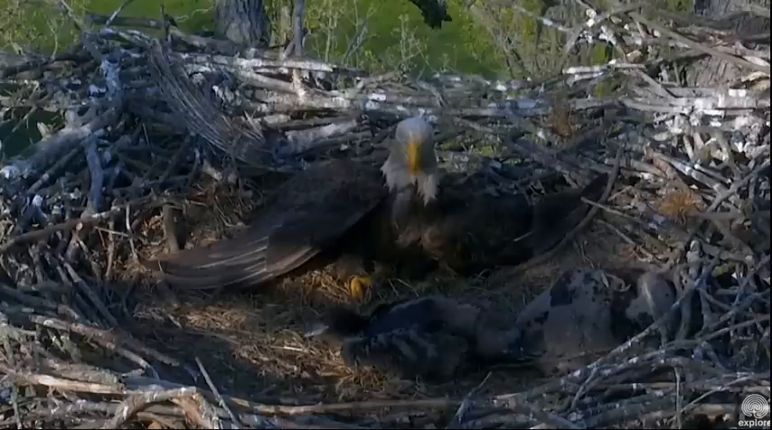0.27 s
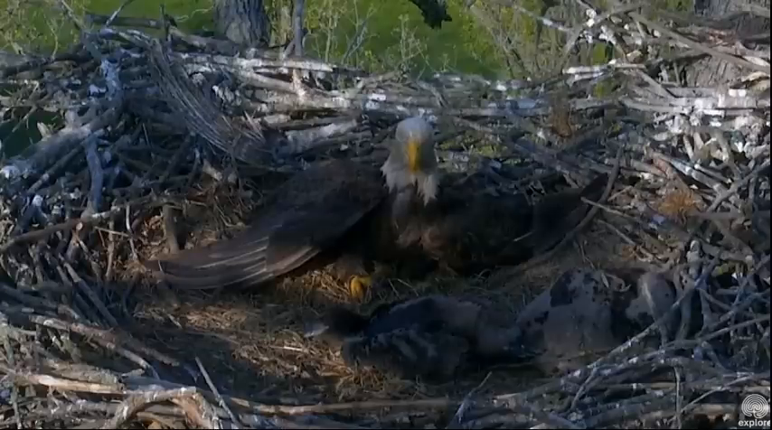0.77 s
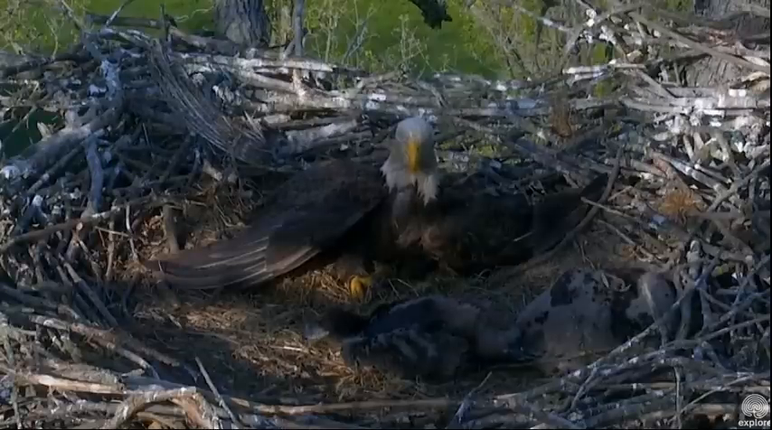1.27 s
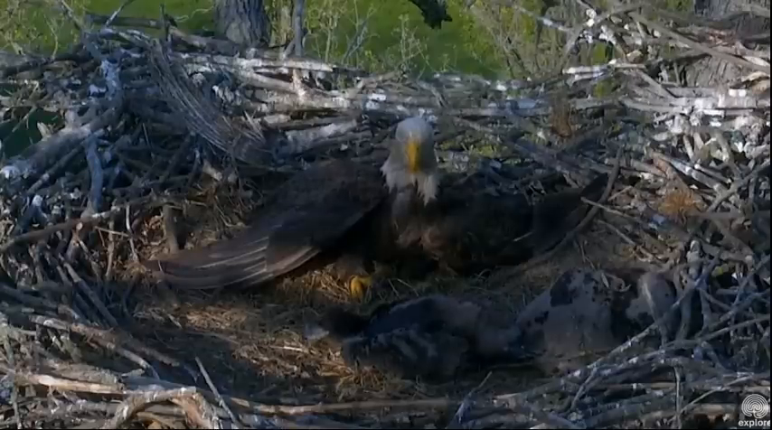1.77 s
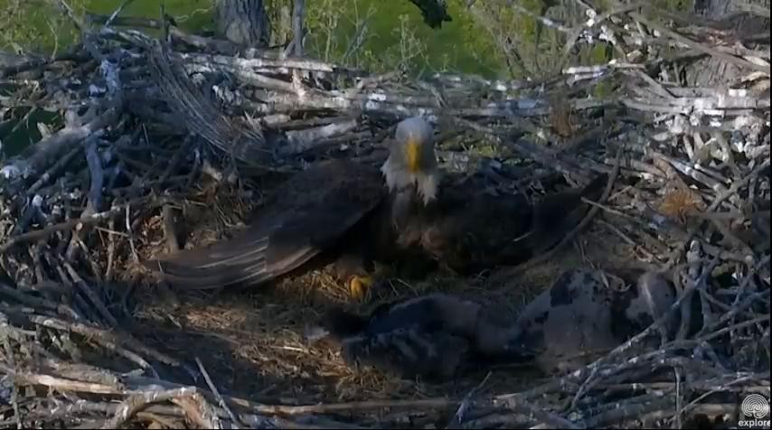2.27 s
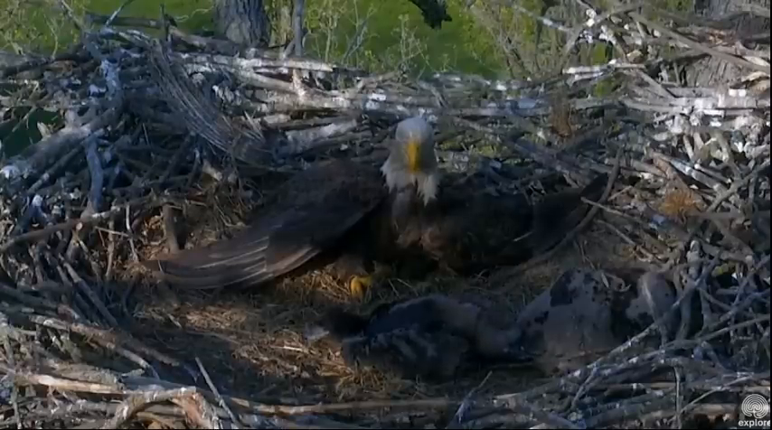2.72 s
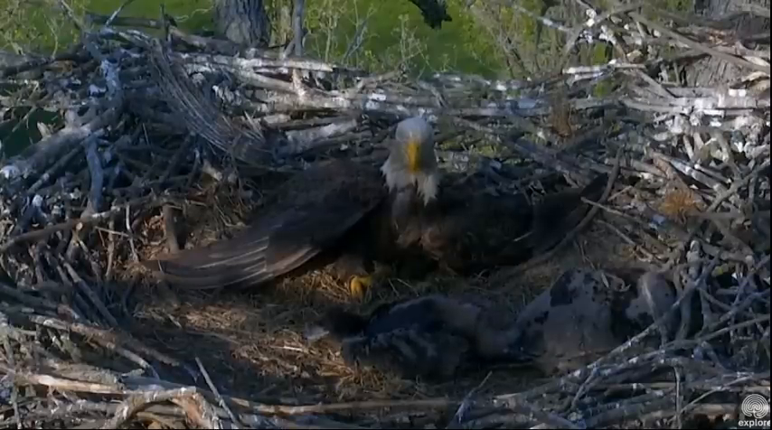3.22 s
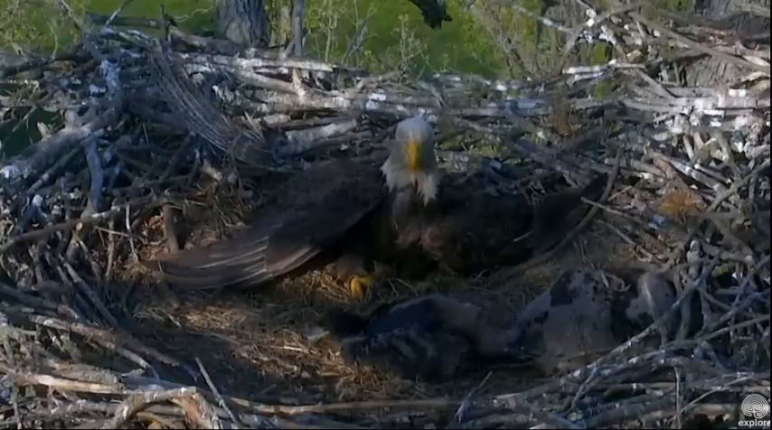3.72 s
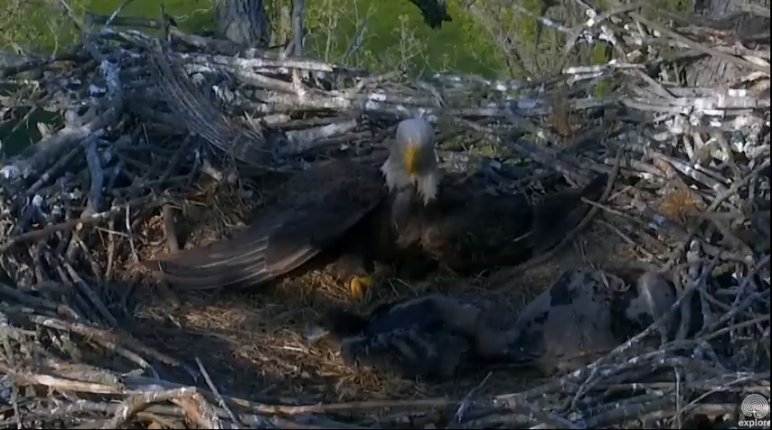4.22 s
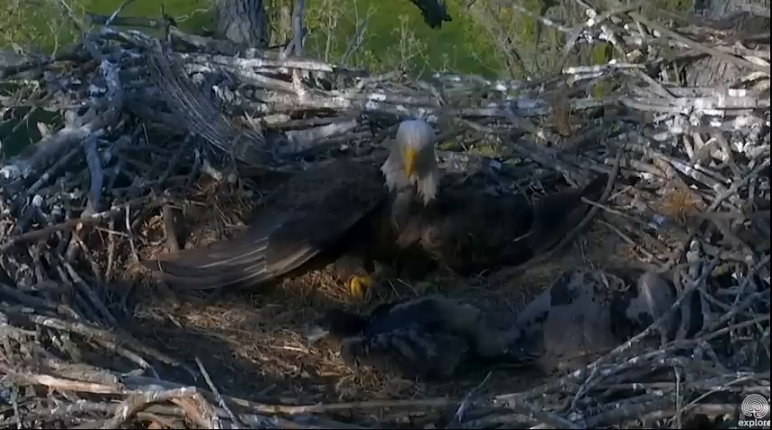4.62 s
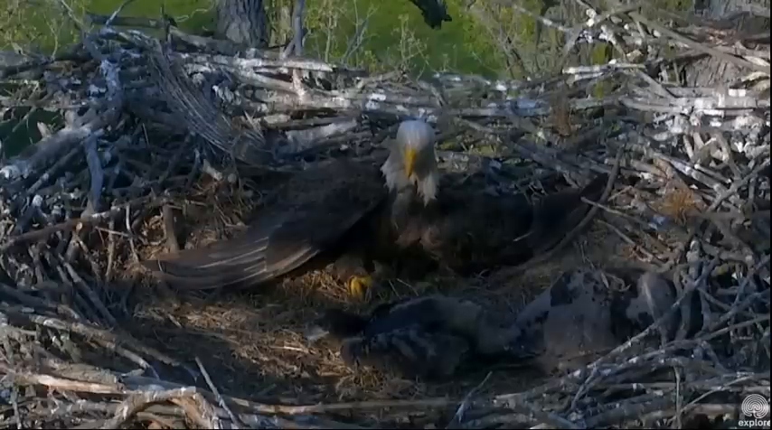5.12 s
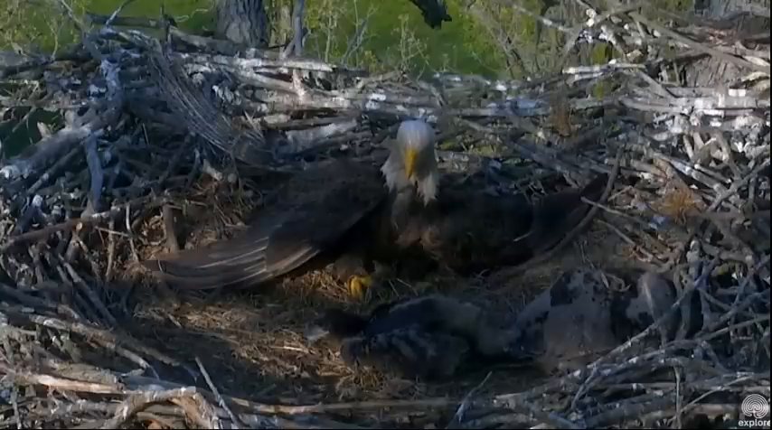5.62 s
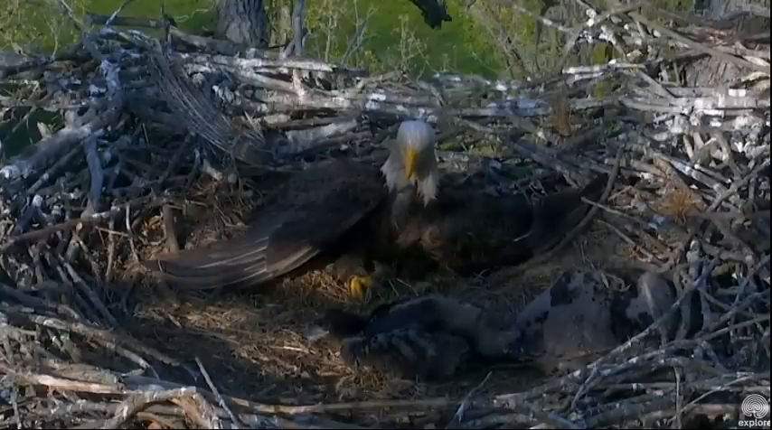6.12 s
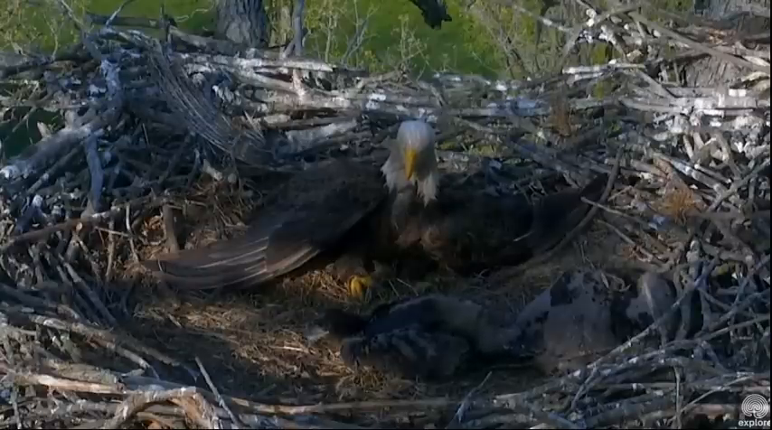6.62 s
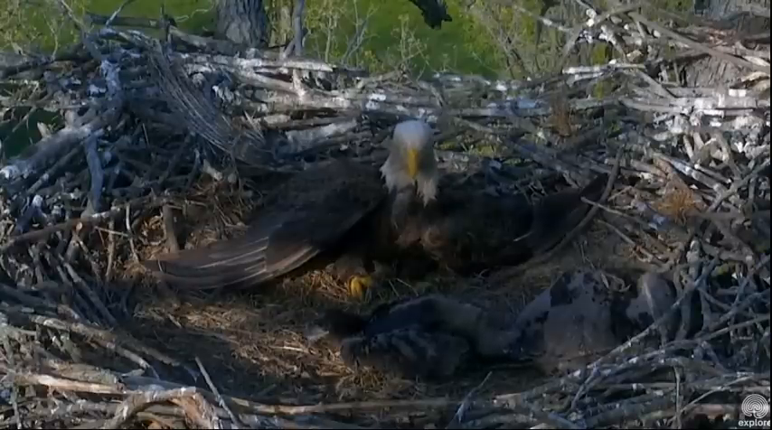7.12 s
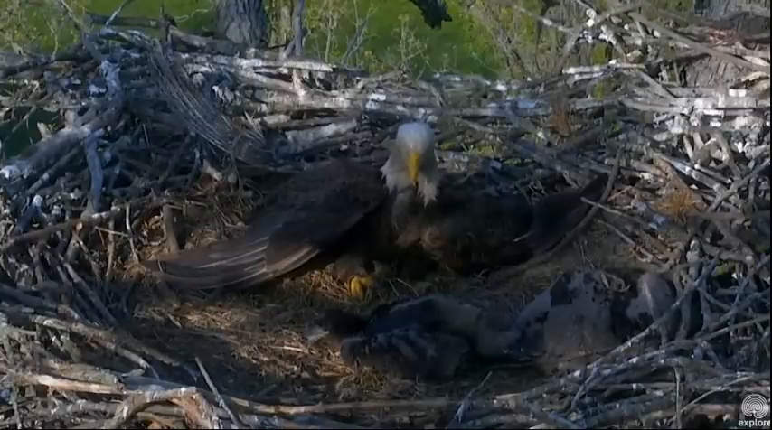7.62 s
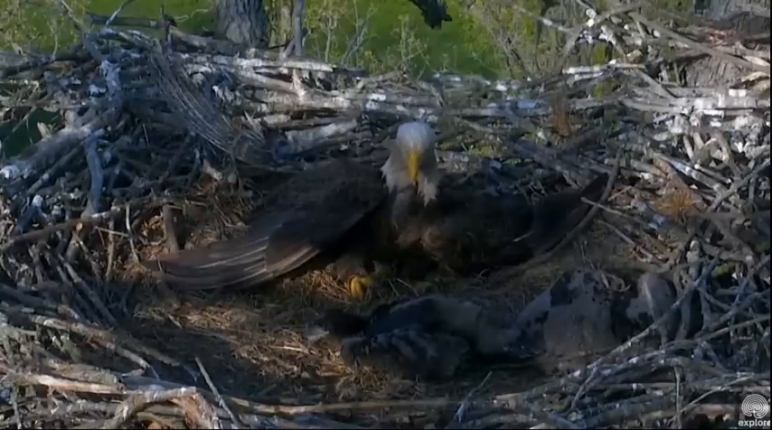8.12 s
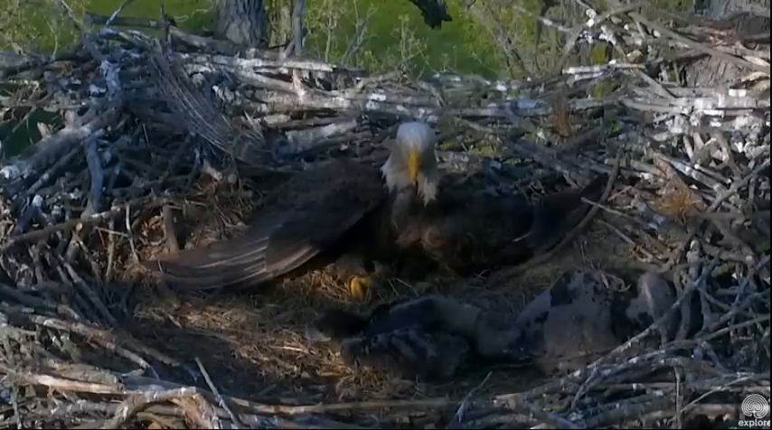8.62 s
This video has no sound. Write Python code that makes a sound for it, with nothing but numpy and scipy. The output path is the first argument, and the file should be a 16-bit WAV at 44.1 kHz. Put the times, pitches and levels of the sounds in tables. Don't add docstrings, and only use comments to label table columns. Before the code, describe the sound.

Four toads at a pond trill in long, purring musical whistles, each pulsing over forty times a second at close but different pitches. Trills enter one by one, build to a shimmering chorus, slow slightly and end separately. Far-off small birds chip, whistle and buzz faintly in the wood. Light outdoor echo, soft air noise, steady low electronic hum and thin whines from a cheap, narrow-band outdoor camera microphone.

```python
import sys
import numpy as np
from scipy import signal
from scipy.fft import rfft, irfft, next_fast_len
from scipy.io import wavfile
from scipy.ndimage import uniform_filter1d

SR = 44100
rng = np.random.default_rng(int(sys.argv[2]) if len(sys.argv) > 2 else 0)


def ratio_of_db(decibels):
    return 10 ** (np.asarray(decibels, float) / 20)


def pcm_store(signal):
    levels = np.round(np.clip(np.atleast_2d(signal), -1, 1) * 32767)
    wavfile.write(sys.argv[1], SR, levels.astype(np.int16).T)


N = 391166


def evened(x):
    return x / np.sqrt(np.mean(x ** 2) + 1e-30)


def read(points, hz):
    f, value = np.transpose(points)
    return np.interp(np.log(hz + 1), np.log(f + 1), value)


def colour(x, points):
    size = next_fast_len(N + 4096)
    gain = ratio_of_db(read(points, np.fft.rfftfreq(size, 1 / SR)))
    return irfft(rfft(x, size) * gain, size)[:N]


def drift(per_s):
    span = max(int(SR / 50 / per_s), 2)
    coarse = rng.standard_normal(N // 50 + 2)
    coarse = uniform_filter1d(uniform_filter1d(coarse, span), span)
    return np.interp(np.arange(N) / 50, np.arange(len(coarse)), evened(coarse))


def whistle(hz, slip=0):
    cycles = np.cumsum(hz) / SR + rng.random()
    return np.sqrt(2) * np.sin(2 * np.pi * cycles + slip)


def wood(x, t60, wet_db, gap=.004):
    size = SR // 2
    taps = np.zeros(size)
    at = np.arange(0, size - 24, 24) + rng.integers(0, 24, (size - 1) // 24)
    taps[at] = rng.choice([-1., 1.], len(at))
    t = np.arange(size) / SR
    taps *= ratio_of_db(-60 * t / t60) * (t > gap)
    echoes = signal.oaconvolve(x, taps / np.linalg.norm(taps))[:N]
    return x + ratio_of_db(wet_db) * echoes


def toad(pace, voice, open_share, edge, sag_hz, wander_hz, uneven_db):
    t = np.arange(N) / SR
    s, level_db, hz = np.transpose(voice)
    gone, pace_points = pace
    at, per_s = np.transpose(pace_points)
    throbs = gone + np.cumsum(np.interp(t, at, per_s, 0)) / SR
    turn = 2 * np.pi * throbs
    closing_point = np.cos(np.pi * np.clip(open_share, .1, .9))
    gate = 1 / (1 + np.exp(-edge * (np.cos(turn) - closing_point)))
    pitch = np.interp(t, s, hz) - sag_hz * np.sin(turn) + wander_hz * drift(14.08)
    effort = ratio_of_db(np.interp(t, s, level_db, -200, -200) + uneven_db * drift(44.0))
    count = np.round(throbs).astype(int)
    slip = np.cumsum(1.7 * rng.standard_normal(500))[count]
    return effort * evened(gate) * whistle(pitch, uniform_filter1d(slip, size=200))


# start_s, level_db, pitch_hz
LOW_VOICE = [
    (0, -59, 1756),
    (2, -56.5, 1747),
    (3, -60.5, 1745),
    (4, -56.5, 1743),
    (6, -55, 1735),
    (7, -57, 1737),
    (7.801, -61.5, 1732),
    (8.3, -62.5, 1749),
    (8.87, -58, 1735),
]
NEAR_VOICE = [
    (1.0, -68, 1790),
    (1.2, -59.5, 1808),
    (1.5, -55, 1820),
    (2, -52.6, 1828),
    (3, -52.2, 1827),
    (5.5, -51, 1823),
    (7.5, -53, 1820),
    (7.85, -54.5, 1810),
    (7.9, -80, 1810),
]
HIGH_VOICE = [
    (1.86, -80, 1900),
    (1.95, -62.5, 1935),
    (2.2, -60, 1945),
    (3, -59.5, 1940),
    (4, -56, 1932),
    (5.5, -54.5, 1932),
    (6.5, -57, 1928),
    (7.02, -59.5, 1918),
    (7.07, -80, 1918),
]
LATE_VOICE = [
    (7.15, -72, 1904),
    (7.7, -62, 1883),
    (8.2, -59, 1868),
    (8.87, -60, 1863),
]
LOW_PACE = .84, [(0, 45.93), (.5, 44.14), (1.5, 44.24), (2.5, 44.82), (4, 43.88), (7, 43.34), (8.87, 42.46)]
NEAR_PACE = .36, [(1, 44.75), (1.4, 47.37), (2, 44.45), (4, 41.62), (5, 42.34), (7, 40.52), (7.5, 40.9),
             (7.9, 37.25)]
HIGH_PACE = .6, [(1.85, 53.03), (2.5, 49.29), (3.5, 46.83), (5, 45.17), (6.5, 43.91), (7.05, 38.78)]
LATE_PACE = .06, [(7.15, 46.79), (8.87, 46.79)]


def chorus():
    low = toad(LOW_PACE, LOW_VOICE, .47, edge=4.5, sag_hz=14, wander_hz=7, uneven_db=1.1)
    near = toad(NEAR_PACE, NEAR_VOICE, .44, edge=4.2, sag_hz=12, wander_hz=6, uneven_db=1.1)
    high = toad(HIGH_PACE, HIGH_VOICE, .33, edge=2.9, sag_hz=8, wander_hz=7, uneven_db=1.1)
    late = toad(LATE_PACE, LATE_VOICE, .38, edge=3.0, sag_hz=8, wander_hz=9, uneven_db=1.3)
    return ratio_of_db(-.6) * sum(wood(voice, .5, -12, gap=.02) for voice in (low, near, high, late))


def note(length_s, start_hz, middle_hz, end_hz, level_db):
    u = np.linspace(0, 1, max(int(length_s * SR), 16))
    hz = start_hz * (1 - u) * (1 - 2 * u)
    hz += middle_hz * 4 * u * (1 - u)
    hz += end_hz * u * (2 * u - 1)
    return ratio_of_db(level_db) * whistle(hz) * signal.windows.tukey(len(u), .25)


def bend(start_hz, end_hz, early):
    return start_hz, start_hz + early * (end_hz - start_hz), end_hz


# start_s, end_hz, level_db
CHIPS = [
    (.195, 3200, -75.5),
    (.302, 2950, -74.5),
    (.354, 3100, -77.5),
    (.419, 2420, -74.5),
    (.522, 2850, -74.5),
    (.637, 2700, -76),
    (.694, 3000, -76.5),
    (.862, 2950, -76),
    (1.037, 2900, -75),
    (1.203, 3300, -79),
]
# start_s, length_s, start_hz, level_db
FALLS = [(.242, .04, 2930, -72.5), (.352, .04, 2950, -74.5), (.441, .03, 2610, -74.5),
         (.582, .021, 2670, -75.5), (.692, .04, 2750, -76.5), (.825, .013, 3400, -73.5),
         (1.036, .036, 2880, -71.5), (1.614, .017, 2450, -73.5), (1.688, .04, 2600, -74.5),
         (2.234, .06, 2950, -75.5), (3.064, .023, 2850, -68.5), (4.185, .04, 2900, -74.5),
         (4.43, .05, 2650, -77.5), (5.43, .02, 3600, -77), (5.755, .02, 3600, -77),
         (8.285, .035, 3660, -79.5), (8.32, .035, 2950, -79.5), (5.915, .03, 3450, -79),
         (8.608, .06, 2950, -78.5), (8.746, .03, 3850, -75.5)]
# start_s, length_s, start_hz, level_db
RISES = [(2.963, .03, 2430, -67.5), (3.545, .03, 2150, -76.5), (3.726, .06, 2650, -73.5),
         (4.558, .04, 2650, -76.5), (6.3, .055, 2400, -79.5), (6.83, .015, 3020, -77.5),
         (7.01, .02, 3020, -77), (7.186, .017, 2250, -75.5), (7.76, .026, 2480, -84.5),
         (8.384, .04, 2850, -79.5), (4.33, .07, 2400, -79), (4.51, .03, 2500, -77), (4.6, .05, 2850, -77),
         (8.842, .021, 3200, -75.5)]
# start_s, start_hz, level_db
TICKS = [(.8, 3500, -76.5), (1.002, 3200, -77.5), (4.455, 3650, -76), (4.506, 2700, -73.5),
         (5.725, 3500, -78), (5.894, 3460, -80.5), (6.97, 3550, -78), (7.27, 3450, -79.5),
         (7.43, 3410, -81.5), (7.585, 3520, -80.5), (8.47, 3380, -77.5)]
# start_s, length_s, end_hz, top_hz, level_db
ARCHES = [
    (2.53, .098, 2250, 3170, -71),
    (4.648, .102, 2900, 3980, -64.5),
    (7.98, .062, 2150, 2960, -72),
    (3.562, .075, 2820, 2660, -68),
    (3.764, .07, 2660, 2540, -73.5),
    (5.173, .06, 2620, 2500, -71),
    (5.176, .047, 3110, 3010, -73.5),
    (8.348, .026, 2480, 2430, -77.5),
]
# start_s, length_s, start_hz, end_hz, level_db
HELD = [(.492, .19, 2080, 2210, -75), (.73, .04, 2850, 3030, -75.5), (1.116, .047, 2320, 2400, -70.5),
        (1.165, .047, 2160, 2040, -69.5), (1.24, .05, 3000, 2950, -76), (1.715, .057, 3000, 2800, -77.5),
        (1.8, .06, 2080, 2220, -77.5), (2.69, .16, 2330, 2200, -71.5), (3.09, .09, 3050, 3130, -78),
        (3.43, .14, 3070, 3020, -73.5), (3.67, .19, 3100, 3300, -65), (3.76, .04, 3600, 3430, -65),
        (3.86, .06, 3200, 3050, -75), (4.2, .14, 2350, 2520, -77.5), (4.98, .12, 3080, 2780, -79.5),
        (5.54, .03, 2850, 2950, -82), (6.23, .06, 2380, 2420, -79), (6.62, .04, 3150, 3100, -82.5),
        (6.71, .04, 2950, 2880, -82.5), (6.88, .034, 2400, 2400, -78.5), (8.02, .06, 2900, 2860, -77.5),
        (8.25, .04, 3430, 3450, -82), (8.472, .126, 3190, 3110, -77.5), (8.52, .07, 2900, 2900, -80)]


def songbirds():
    chip_top_hz, chip_s, tick_s = 4150, .028, .022
    fall, rise, tick_fall = .76, 1.17, .91
    notes = [(s, chip_s, *bend(chip_top_hz, hz, .58), db) for s, hz, db in CHIPS]
    notes += [(s, span, *bend(hz, fall * hz, .58), db) for s, span, hz, db in FALLS]
    notes += [(s, span, *bend(hz, rise * hz, .38), db) for s, span, hz, db in RISES]
    notes += [(s, tick_s, *bend(hz, tick_fall * hz, .4), db) for s, hz, db in TICKS]
    notes += [(s, span, hz, top_hz, hz, db) for s, span, hz, top_hz, db in ARCHES]
    notes += [(s, span, *bend(hz, end_hz, .8), db) for s, span, hz, end_hz, db in HELD]
    out = np.zeros(N + SR)
    for s, *rest in notes:
        sound = note(*rest)
        out[round(s * SR):][:len(sound)] += sound
    return wood(out[:N] * ratio_of_db(2.2 * drift(130.0)), .55, -6, gap=.012)


# start_s, length_s, level_db, centre_hz
BUZZES = [(-.2, 0.37, -68, 3250), (.3, 1.1, -80, 2999), (2.69, .41, -69, 3200), (3.151, .38, -75.5, 2966),
          (3.56, 0.41, -71, 3163), (4.161, .17, -73.5, 3050), (4.45, .35, -74, 2993),
          (4.96, .36, -75, 3064), (5.65, 0.21, -78.5, 3145), (6.3, .5, -84, 3080),
          (6.851, 0.21, -79.5, 3366), (7.701, 0.19, -83, 3350), (8.2, 0.59, -84, 3113)]


def marsh_birds():
    rise_s, fade_db_per_s, murmur_db = .07, 90, -91.5
    t = np.arange(N) / SR
    level = []
    for s, span, db, _ in BUZZES:
        fade_db = fade_db_per_s * np.maximum(t - s - span, 0)
        level.append(ratio_of_db(db - fade_db) * np.clip((t - s) / rise_s, 0, 1))
    loudest = np.argmax(level, 0)
    centre = uniform_filter1d(np.array(BUZZES)[loudest, 3], size=2000)
    out = np.zeros(N)
    for sweeps_hz, detune, depth_hz in ((127.3, 1.0, 90), (149.5, .97, 160), (89.3, .86, 190), (109.6, 1.1, 175)):
        sweep = np.sin(2 * np.pi * np.cumsum(sweeps_hz + 14 * drift(40.0)) / SR)
        pitch = centre * detune + depth_hz * sweep + 75 * drift(40.0)
        out += whistle(pitch) * ratio_of_db(1.6 * drift(45.0))
    buzz = evened(out) * (np.max(level, 0) + ratio_of_db(murmur_db))
    return wood(buzz * ratio_of_db(-4.5), .3, 1)


# pitch_hz, level_db (per Hz)
AIR = [(20, -106), (300, -104), (600, -103), (720, -97.5), (1000, -95.5), (1150, -102), (1400, -96.5),
       (1530, -99.5), (1580, -90), (1680, -92.5), (1900, -93), (2060, -110), (2700, -112), (3300, -113.5),
       (4400, -115)]


def air():
    noise = colour(rng.standard_normal(N), AIR)
    return np.sqrt(SR / 2) * noise * ratio_of_db(.31 * drift(8.3))


def tones(hz, orders, wander_hz, flicker_db):
    turn = 2 * np.pi * np.cumsum(hz + wander_hz * drift(1.5)) / SR + .4
    cycle = np.zeros(N)
    for k, db in orders:
        offset = 2.5 - 1.76 / k ** 3 + 2 * (k > 5)
        cycle += ratio_of_db(db) * np.cos(k * turn + offset)
    return np.sqrt(2) * ratio_of_db(flicker_db * drift(6.2)) * cycle


# multiple of the base pitch, level_db
HUM = [(1, -83), (2, -80.6), (3, -80), (4, -86.5), (5, -83), (6, -89), (7, -91), (8, -91), (10, -88),
       (11, -94), (12, -94), (13, -93), (14, -96), (15, -96)]
# multiple of the base pitch, level_db
WHINE = [(7, -82.5), (8, -87.5), (9, -70.5), (10, -80), (11, -94.5), (12, -69.5), (13, -92.5), (14, -72.5),
         (15, -70), (25, -92.5), (34, -94.5)]
# multiple of the base pitch, level_db
DRONE = [(2, -85), (5, -78), (6, -90.5)]


def camera():
    hum = tones(30.0, HUM, wander_hz=0, flicker_db=0)
    whine = tones(97.23, WHINE, wander_hz=.03, flicker_db=.66)
    drone = tones(200.5, DRONE, wander_hz=.1, flicker_db=1.4)
    return hum + whine + drone


def scene():
    return (chorus() + songbirds() + marsh_birds() + air() + camera())[None]


def top_cut(x):
    return signal.sosfilt(signal.butter(12, 15700, fs=SR, output="sos"), x)


# pitch_hz, level_db
ROLL_OFF = [(3200, 0), (3500, -4.5), (3750, -8.5), (4000, -17), (4300, -29), (4700, -76.5)]
# pitch_hz, level_db
LEAK = [(4000, 1), (4400, -3.5), (5000, -12), (5500, -17.5), (6180, -29.5), (6550, -37), (7100, -54),
        (8000, -67), (9170, -48), (9820, -38.5), (11000, -27), (12000, -21), (13000, -28.5), (14180, -43.5),
        (14600, -49)]


def record(dry):
    sample_hz, hiss_db, edge_hz = 8000, -96, 15700
    band = colour(dry[0], ROLL_OFF)
    turn = 2 * np.pi * sample_hz * np.arange(N) / SR
    sampled = band * (1 + 2 * np.cos(turn) + 2 * np.cos(2 * turn))
    smooth = colour(sampled, LEAK) + ratio_of_db(hiss_db) * rng.standard_normal(N)
    cut = colour(smooth, [(edge_hz, 0), (edge_hz + 60, -40)])
    return top_cut(cut[None])


dry = scene()
out = record(dry)
pcm_store(out)
```